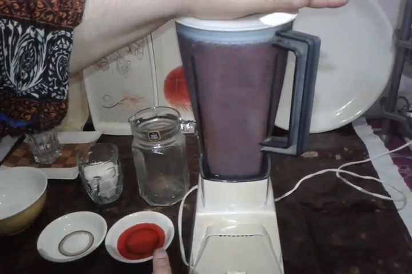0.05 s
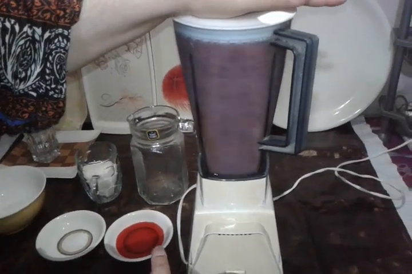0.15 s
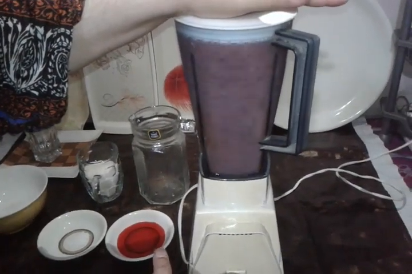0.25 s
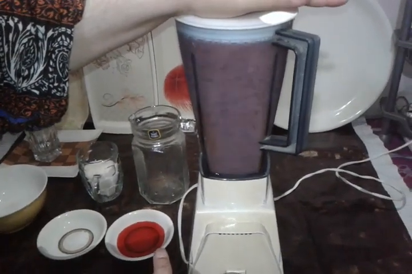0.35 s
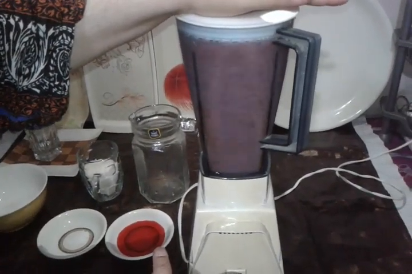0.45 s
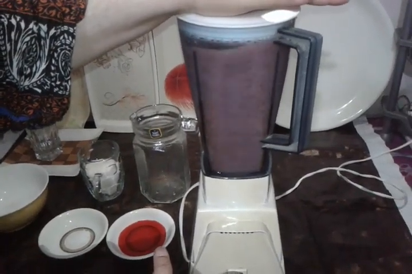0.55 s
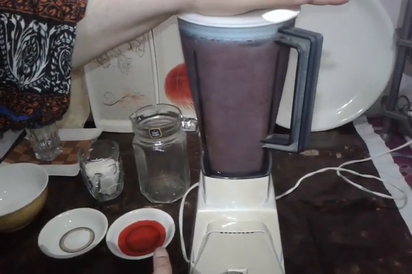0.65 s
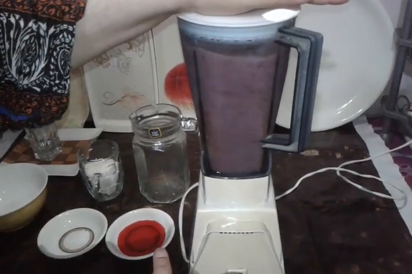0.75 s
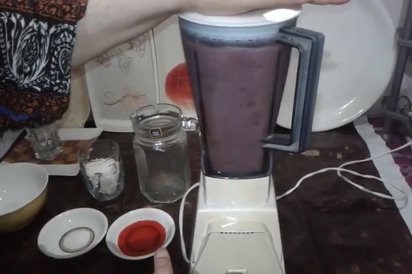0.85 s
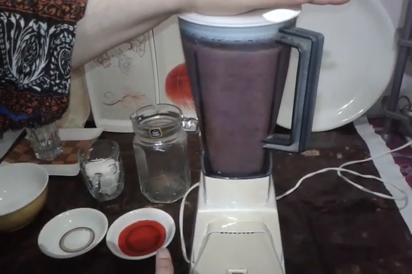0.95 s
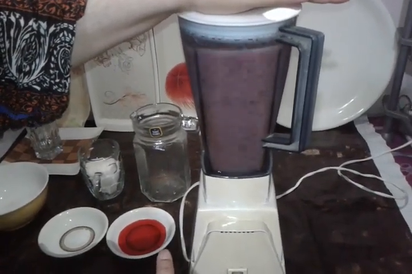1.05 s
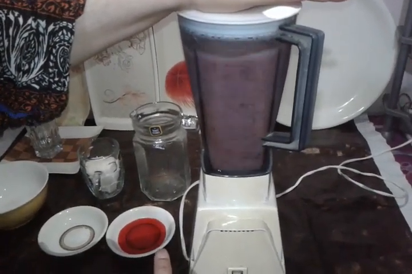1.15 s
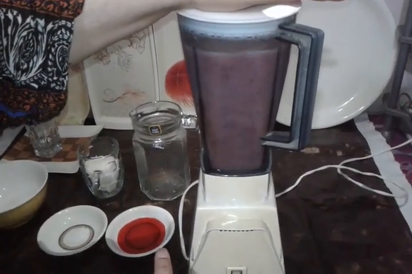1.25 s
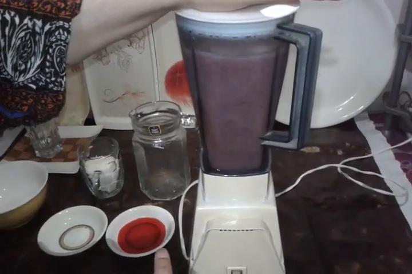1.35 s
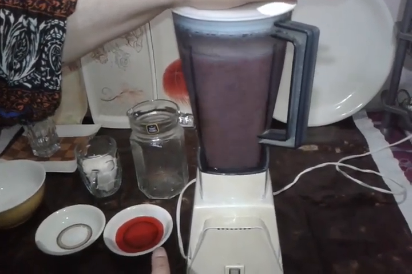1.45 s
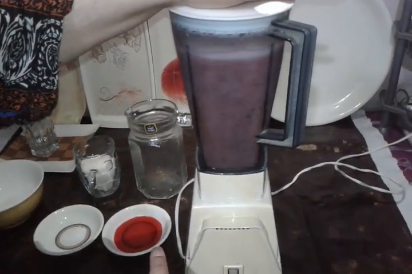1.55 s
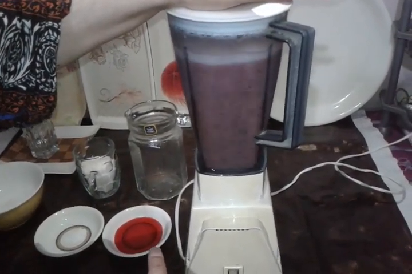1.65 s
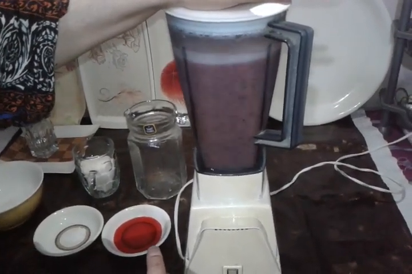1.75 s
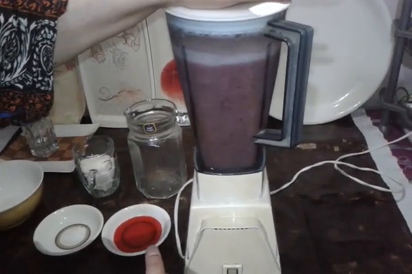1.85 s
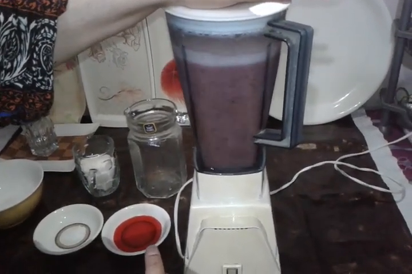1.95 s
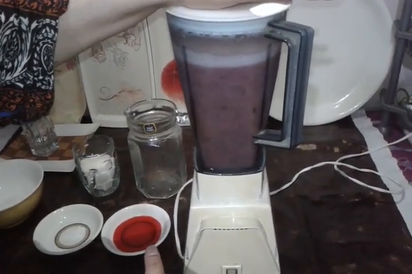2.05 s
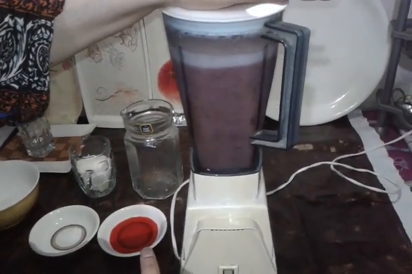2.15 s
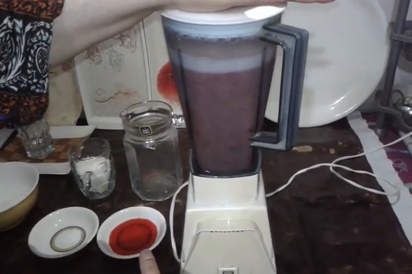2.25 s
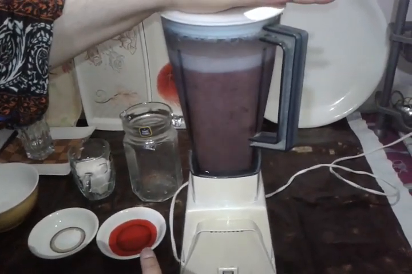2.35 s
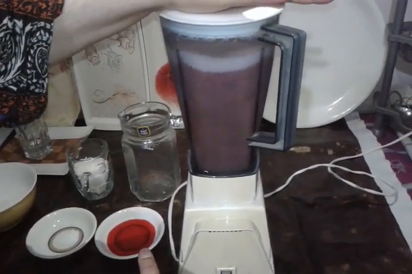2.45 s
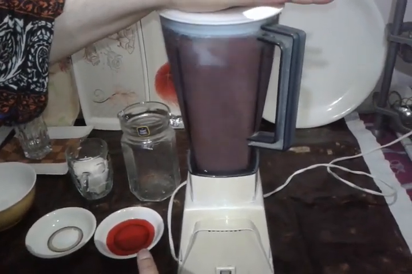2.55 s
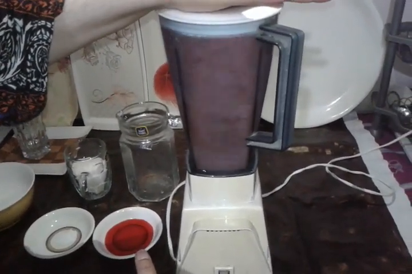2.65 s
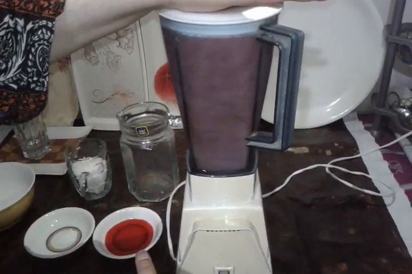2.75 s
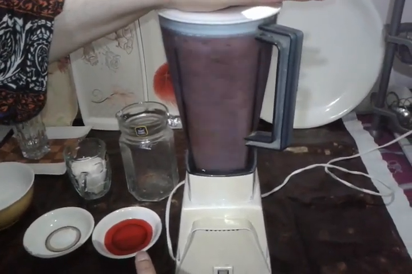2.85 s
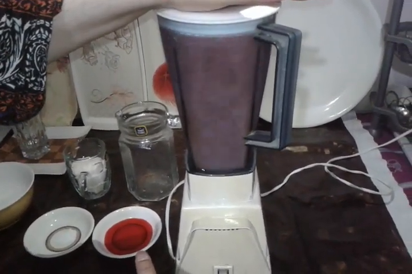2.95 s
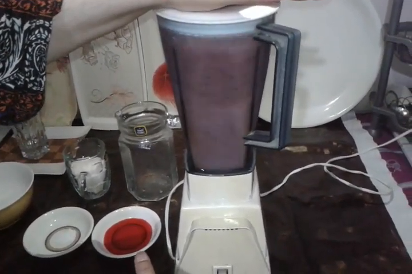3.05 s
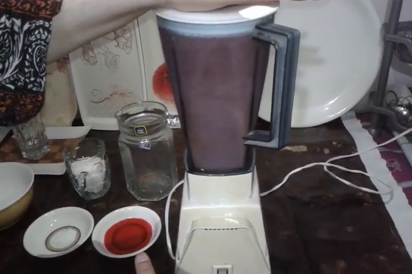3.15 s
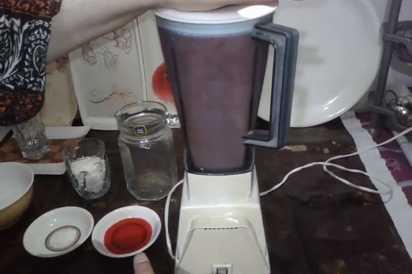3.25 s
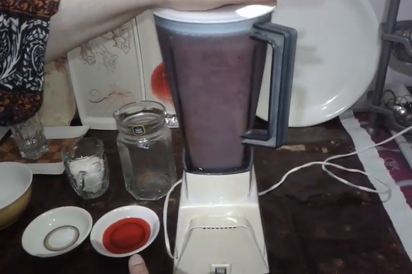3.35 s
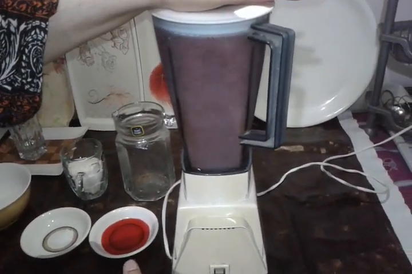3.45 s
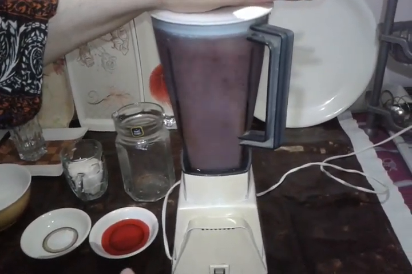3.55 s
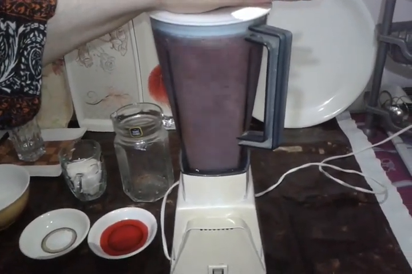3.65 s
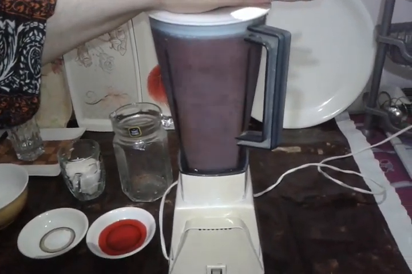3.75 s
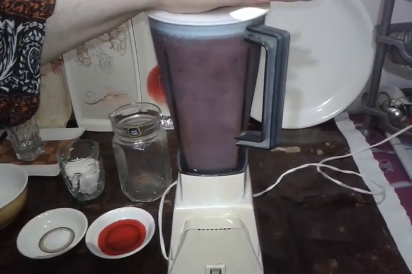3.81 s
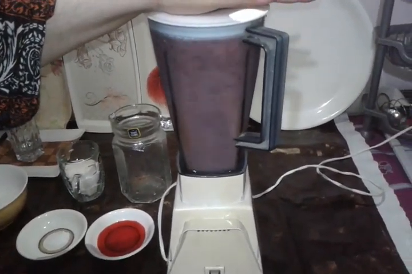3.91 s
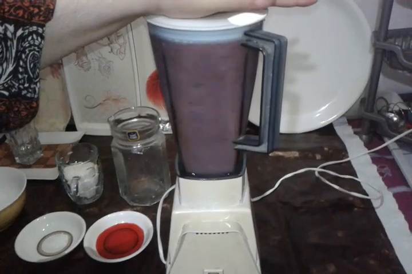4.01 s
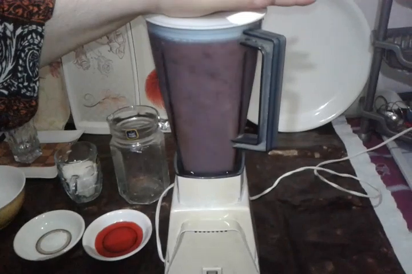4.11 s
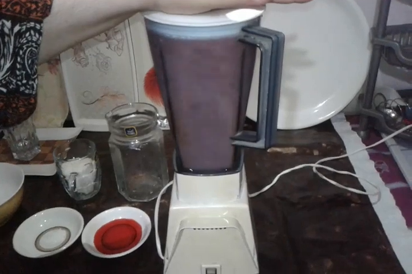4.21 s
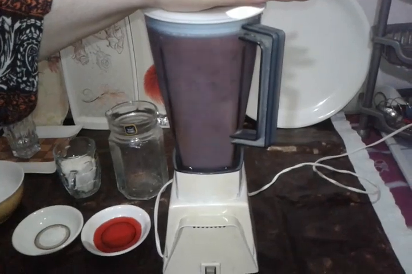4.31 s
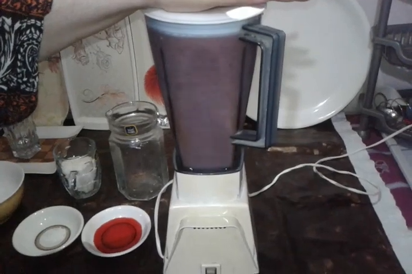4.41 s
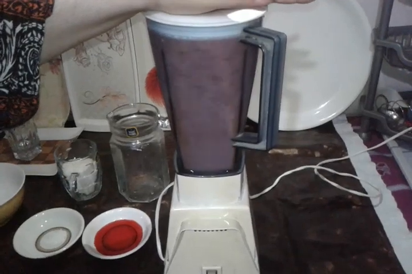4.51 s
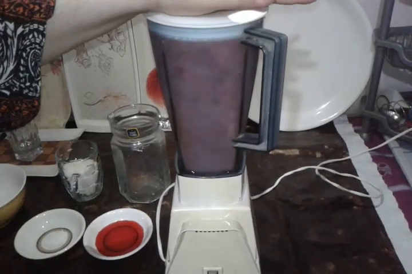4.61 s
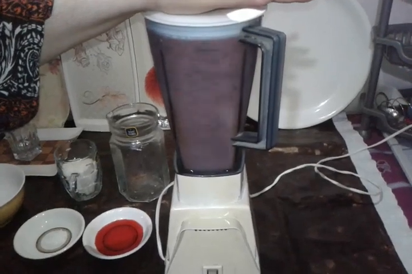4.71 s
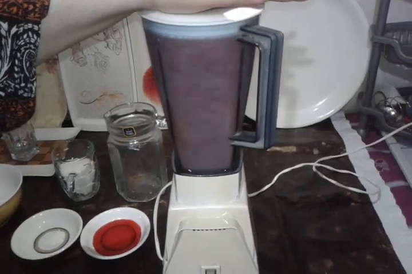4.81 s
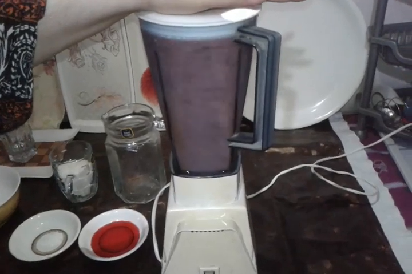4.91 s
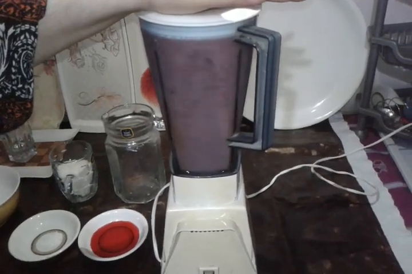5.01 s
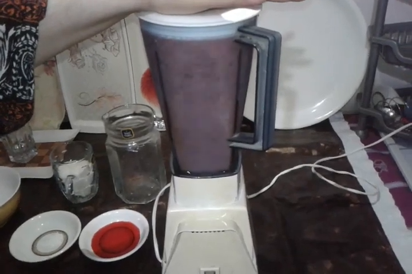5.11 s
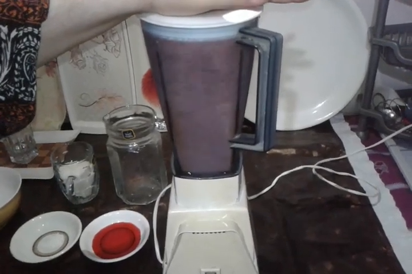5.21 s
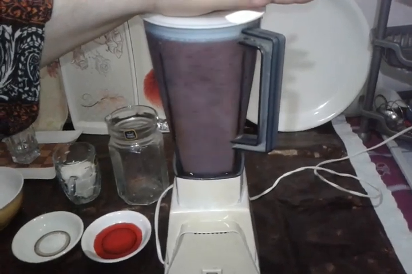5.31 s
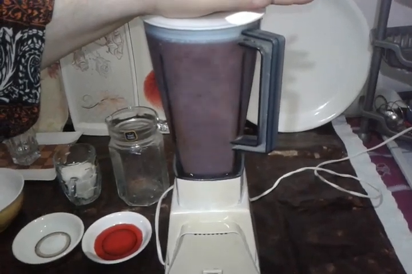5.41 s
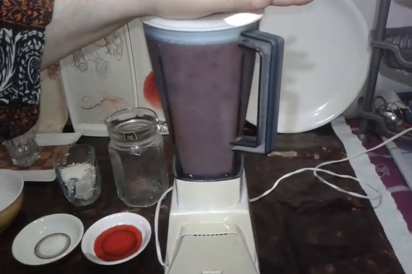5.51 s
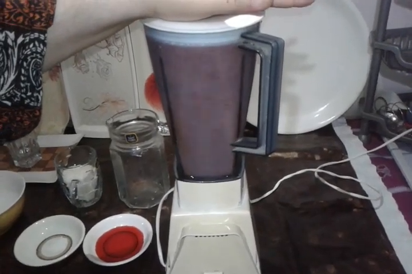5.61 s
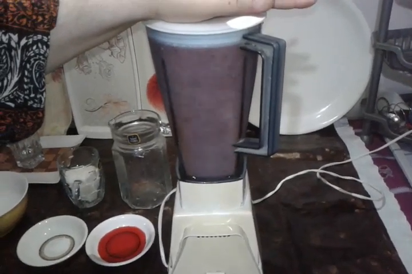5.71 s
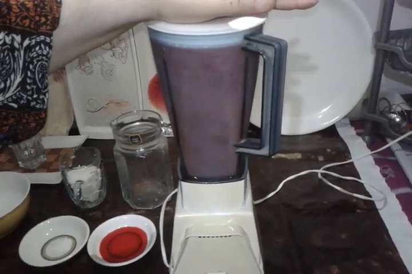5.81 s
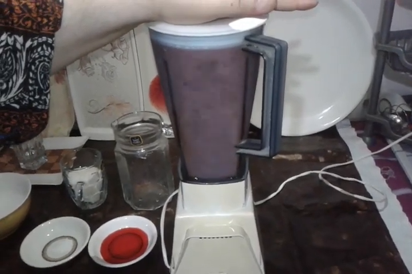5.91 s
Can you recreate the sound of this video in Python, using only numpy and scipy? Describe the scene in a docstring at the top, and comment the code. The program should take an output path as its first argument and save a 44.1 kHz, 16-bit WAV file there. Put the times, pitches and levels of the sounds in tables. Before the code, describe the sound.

A close mono pickup in a small, slightly reverberant kitchen. At 0 s a blender runs at full speed: motor hum around 236 Hz and its double, harsh rattle near 2 kHz, hissing bubbles around 5 kHz. Power is cut at about 0.13 s; the pitch glides down, the churning falls away abruptly around 0.5 s, and liquid sloshes to rest. From 0.55 to 2.3 s an insect gives rapid, even, raspy chirps near 6.8 kHz, about ten a second, growing slightly, over faint room hush; froth seethes softly around 1.2 s. A tiny knock comes at 1.8 s. At 2.36 s the switch snaps sharply; the blades labour in a low, loud growl with heavy liquid tumbling. At 2.66 s a gulp, then the motor races up within about 0.3 s, its pitch wavering briefly before steadying. Dense churning, a thin high whine and irregular bright seed ticks continue to the cut at 6 s.

```python
"""Blender, lull and restart

A countertop blender churns fruit and water in a small kitchen, is switched off and coasts to rest.
In the lull an insect chirps over the room's hush. The switch snaps, the blades labour in the settled
pulp, then draw a vortex and the motor races up to a whine, with seeds ticking on the jar.
The motor is sine tones locked to one shaft; churning, liquid, contacts and air are coloured noise."""
import sys
import numpy as np
from scipy import signal
from scipy.fft import rfft, irfft, next_fast_len
from scipy.io import wavfile
from scipy.ndimage import map_coordinates

SR = 44100
rng = np.random.default_rng(int(sys.argv[2]) if len(sys.argv) > 2 else 0)


def generate_wav(signal):
    """Clip the signal to [-1, 1] and save it as 16-bit WAV at the path in sys.argv[1]."""
    frames = np.transpose(np.atleast_2d(signal))
    scaled = np.clip(frames, -1, 1) * 32767
    pcm = np.round(scaled).astype(np.int16)
    wavfile.write(sys.argv[1], SR, pcm)


N = 263277

# In every colour table the level is relative: it sets the balance of the spectrum only.

# shaft speed with the vortex open, before hunting and waver: (time [s], speed [turns/s])
FREE_SPEED = [(0, 236), (3.1, 236.5), (3.65, 239.5), (4.3, 234.3), (4.6, 236), (5.05, 240.5), (5.35, 238),
              (5.97, 238.3)]
# unbalanced shaft and two-armed coupling at full speed: (time [s], once-a-turn [dB], twice-a-turn [dB])
SHAFT_HUM = [(0, -26.5, -22.5), (2.6, -26.5, -19), (2.74, -29, -25), (2.88, -25.5, -17), (3.0, -24, -28),
             (3.08, -28.5, -20.5), (3.3, -28, -22), (4.2, -28, -21.5), (4.35, -27.5, -27),
             (4.7, -28.5, -24.5), (5.97, -30, -25.5)]
# weaker shaft orders at full speed: (multiple of shaft speed, level [dB])
SHAFT_ORDERS = [(3, -39.5), (4, -43.5), (5, -42.5), (6, -38), (7, -38.5), (8, -45.5), (9, -39), (10, -48)]
# filled-jar resonances that the blade beat sweeps through: (frequency [Hz], width [Hz], gain [dB])
JAR_RESONANCES = [(437, 35, -4.5), (569, 79, -0.5)]
# colour of pulp rattling the jar: (frequency [Hz], level [dB])
RATTLE_COLOUR = [(400, -45.5), (650, -3.5), (820, -13), (1000, -6.5), (1200, -4.5), (1550, -4),
                 (1750, -3.5), (1930, 4), (2130, -0.5), (2300, -7), (2700, -11.5), (3300, -14.5),
                 (4200, -17.5), (6000, -73)]
# colour of collapsing bubbles: (frequency [Hz], level [dB])
CAVITATION_COLOUR = [(2400, -49.5), (3200, -20.5), (3650, -15.5), (4200, -7), (4700, 0), (5100, -3.5),
                     (5500, -8), (5800, -8.5), (6300, -16.5), (6900, -22.5), (7600, -35), (9500, -52)]
# colour of the fine hiss above them: (frequency [Hz], level [dB])
SPRAY_COLOUR = [(4120, -48), (7000, 0), (8560, 3.5), (9300, -4.5), (9720, -5.5), (10700, 1.5), (11800, -5),
                (13200, -2), (13700, -9), (14200, -11)]
# bubble clouds collapse as the load shifts: (time [s], extra cavitation and spray [dB], half length [s])
SURGES = [(.135, 3, 0.012), (0.47, 3.5, 0.017), (2.45, 4, 0.057)]
# colour of tumbling liquid: (frequency [Hz], level [dB])
LIQUID_COLOUR = [(25, -35), (60, -21), (100, -22.5), (135, -5.5), (170, -11), (228, 3), (290, -6.5),
                 (420, 3.5), (560, 5.5), (690, -10.5), (800, -10), (1200, -34)]
# the opening vortex swallows air: (time [s], strength [dB])
GULP = [(2.659, -10.5), (2.666, -29)]
# colour of the gulp: (frequency [Hz], level [dB])
GULP_COLOUR = [(50, -43), (120, -21), (220, -4.5), (300, 0), (420, -4), (600, -22), (1000, -40)]
# colour of trapped air surfacing: (frequency [Hz], level [dB])
SEETHE_COLOUR = [(3800, -45), (4500, -12), (4740, 0), (4950, -6), (5300, -13), (6000, -44)]
# seeds flung at the jar: (time [s], strength [dB])
SEEDS = [(.1196, -16), (.3072, -19), (.5043, -16.5), (.862, -31), (1.185, -45), (2.3955, -16.5),
         (2.6693, -18), (2.7352, -15), (2.9567, -14), (3.1248, -16.5), (3.2061, -16.5), (3.46, -12),
         (3.9175, -16), (3.9774, -15.5), (4.1515, -12.5), (4.3001, -12.5), (4.4583, -13), (4.5311, -17),
         (4.7356, -14.5), (4.8863, -16)]
# colour of a seed tick: (frequency [Hz], level [dB])
SEED_COLOUR = [(1500, -22), (3500, -8), (5500, 13.5), (7000, -4), (8400, 0), (9600, -6), (11000, -4),
               (14000, -5)]
# nudges of the housing: (time [s], strength [dB])
KNOCKS = [(1.79, -35.5), (2.3415, -27)]
# colour of a nudge: (frequency [Hz], level [dB])
KNOCK_COLOUR = [(60, -35), (150, -18), (300, -12), (430, 6), (750, -20), (2000, -4), (3000, -29),
                (9000, -52)]
# the switch snaps on: (time [s], strength [dB])
SWITCH = [(2.3562, -5.5)]
# colour of the snap: (frequency [Hz], level [dB])
SWITCH_COLOUR = [(100, -47), (300, -22), (1200, -14), (1650, -3), (1970, 7), (2300, -4), (2800, -17),
                 (4700, 1), (6000, -4), (8000, -18), (14000, -19)]
# loudness curve of the insect: (time [s], gain [dB])
CHIRP_LEVEL = [(.55, -42.5), (1.2, -40.5), (1.6, -37.5), (2.3, -36)]
# sharp resonance of the insect: (frequency [Hz], level [dB])
INSECT_COLOUR = [(4500, -27), (5700, -24), (6100, -3), (6450, 0), (6700, 8), (6900, 8.5), (7050, 6.5),
                 (7200, -17), (7450, -22), (8500, -55), (13000, -28), (15000, -40)]
# loudness curve of the room's air: (time [s], gain [dB])
HUSH_LEVEL = [(0, -39), (1.2, -54), (1.6, -50), (2.35, -49), (5.97, -41)]
# colour of the room's air: (frequency [Hz], level [dB])
HUSH_COLOUR = [(35, -63), (60, -14), (178, -12), (233, 0), (299, -12.5), (384, -8), (552, -15), (619, -2),
               (655, -15), (840, -9), (1230, -12), (1990, 0.5), (2700, -17), (5070, -11), (5800, -12),
               (7540, -41), (12800, -120)]
# faint hum of the room: (frequency [Hz], level [dB])
ROOM_HUM = [(102.3, -73.5), (236.9, -75), (382.2, -67)]

# power cut, vortex falls in, power back, vortex opens
OFF_S, COLLAPSE_S, ON_S, VORTEX_S = 0.13, 0.5, 2.356, 2.692
# time constants of coasting, starting in pulp and racing up
COAST_S, START_S, RACE_S = 0.475, 0.047, 0.095
LABOUR_HZ = 136.56  # mean shaft speed with the blades buried in pulp
STIR_S = 0.033  # the settled pulp takes this long to start moving
# the speed swings while the new vortex steadies
HUNT_HZ, HUNT_PERIOD_S, HUNT_CREST_S, HUNT_LIFE_S = 3.87, 0.26, 3.37, 0.51
COAST_SHAKE = 0.54  # phase flutter of the unpowered shaft [radians], growing as it slows
HUM_FADE_S, HUM_FADE_DB_PER_S = 0.33, 110  # the coasting shaft stops shaking the housing
ONCE_POWER, TWICE_POWER, CHURN_POWER = 1.8, 4.3, 0.56  # amplitude grows as this power of the speed
# blade beat ahead of the jar's resonances: driven through pulp, coasting, in the vortex
BLADE_DB, BLADE_COAST_DB, BLADE_FREE_DB = -18.5, -30, -35
WALL_HZ, WALL_WIDTH_HZ, WALL_LIFT_DB = 1914, 135, 9.5  # the jar wall lifts any shaft order passing here
WHINE_DB, WHINE_SWELL_S = -33, 0.65  # the commutator stands out once the vortex opens
RATTLE_DB, CAVITATION_DB, SPRAY_DB = -22, -20.5, -35  # churning at full speed
LOAD_DB = 2.5  # extra churning with the blades buried
# motor and churning drop as the vortex falls in, then die away
COLLAPSE_DB, COLLAPSE_FALL_S, SETTLE_DB_PER_S = 5.5, 0.051, 28.5
SLOSH_DB, SLOSH_LOAD_DB, SLOSH_COAST_DB = -33.5, 10.5, 0.5  # base, rise when labouring, rise when coasting
SLOSH_REST_S, SLOSH_DB_PER_S = 0.74, 62  # the liquid comes to rest from here on
# trapped air surfaces: crest time and level, slopes on either side
SEETHE_S, SEETHE_DB, SEETHE_RISE_DB_PER_S, SEETHE_FALL_DB_PER_S = 1.23, -47.5, 28, 48
CHIRP_FIRST_S, CHIRP_PERIOD_S = 0.552, 0.0969
TOP_HZ = 14050  # band limit of the recorder


def shaft():
    """Turns per second: drag slows the shaft, pulp holds it back, the vortex sets it free."""
    t = clock()
    free, = curves(FREE_SPEED)
    swing = t - HUNT_CREST_S
    hunt_life = np.exp(-0.5 * (swing / HUNT_LIFE_S) ** 2)
    free = free + HUNT_HZ * np.cos(2 * np.pi * swing / HUNT_PERIOD_S) * hunt_life
    coasting = free * np.exp(-since(OFF_S) / COAST_S)
    starting = LABOUR_HZ * (1 - np.exp(-since(ON_S) / START_S))
    racing = (free - LABOUR_HZ) * (1 - np.exp(-since(VORTEX_S) / RACE_S))
    return np.where(t < ON_S, coasting, starting + racing)


def motor(speed, angle, load, coasting, settle_db):
    """Shaft orders with mains ripple, the blade beat through the jar, and the commutator's whine."""
    once_db, twice_db = curves(SHAFT_HUM)
    pace = speed / speed.max()
    angle = angle + coasting * COAST_SHAKE * wobble(44.8) * (1 - pace)

    once = amp(once_db + 1.33 * wobble(14) + 4.3 * coasting * wobble(28.8)) * pace ** ONCE_POWER
    twice = amp(twice_db + 1.2 * wobble(13) + 4.3 * coasting * wobble(31)) * pace ** TWICE_POWER
    hum = once * tone(angle) + twice * tone(2 * angle)
    hum *= amp(-HUM_FADE_DB_PER_S * coasting * since(HUM_FADE_S))

    # mains torque ripple: tones 100 and 200 Hz above the shaft orders, as strong as the shaft's level sets
    mains = 2 * np.pi * 100 * clock()
    ripple = once * (amp(-17.5) * tone(angle + mains) + amp(-14) * tone(angle + 2 * mains))
    ripple += twice * amp(-16) * tone(2 * angle + mains)

    # four beats a turn, loudest where they cross a resonance of the jar
    beat = load * amp(BLADE_DB) + coasting * amp(BLADE_COAST_DB)
    beat += (1 - load - coasting) * amp(BLADE_FREE_DB)
    jar = sum(amp(db) * resonance(4 * speed, hz, width) ** 2 for hz, width, db in JAR_RESONANCES)
    blades = beat * jar * amp(3.5 * wobble(70)) * tone(4 * angle + 0.5 * wobble(61))

    # play in the coupling makes the higher orders flutter
    buzz = np.zeros(N)
    for order, db in SHAFT_ORDERS:
        lift_db = WALL_LIFT_DB * resonance(order * speed, WALL_HZ, WALL_WIDTH_HZ)
        buzz += amp(db + lift_db + 2.96 * wobble(12)) * tone(order * angle + 0.55 * wobble(30))
    buzz *= pace ** 1.4

    # 24 commutator cycles a turn
    whine = amp(WHINE_DB + 2.5 * wobble(9)) * tone(24 * angle + 0.25 * wobble(70))
    whine *= ramp(VORTEX_S, WHINE_SWELL_S)

    # the small housing radiates little bass
    housing = signal.butter(9, 133, "highpass", fs=SR, output="sos")
    return signal.sosfilt(housing, amp(settle_db) * (hum + ripple + blades + buzz + whine))


def churn(angle, effort_db):
    """Pulp and collapsing bubbles hammer the jar; the rattle pulses with the shaft's turns."""
    surge_db = sum(db * np.exp(-0.5 * ((clock() - s) / length) ** 2) for s, db, length in SURGES)
    sweep = 1 + 0.06 * np.sin(angle) + 0.15 * np.sin(2 * angle)
    rattle = unit(coloured(crackle(rate=4500, spread_db=0) * sweep, RATTLE_COLOUR))
    rattle *= amp(RATTLE_DB + effort_db + 0.52 * wobble(45))

    bursts = crackle(rate=8000, spread_db=0) * amp(0.28 * wobble(140))
    cavitation = unit(coloured(bursts, CAVITATION_COLOUR))
    cavitation *= amp(CAVITATION_DB + effort_db + surge_db + 0.6 * wobble(25))

    droplets = bursts + 1.7 * crackle(rate=11000, spread_db=-2)
    spray = unit(coloured(droplets, SPRAY_COLOUR))
    spray *= amp(SPRAY_DB + effort_db + surge_db + 0.88 * wobble(33))
    return kitchen(rattle + cavitation + spray, wet_db=-5, t60=0.46)


def slosh(load, coasting):
    """Liquid tumbles in the jar, gulps as the vortex opens, and seethes when left to settle."""
    coast_db = SLOSH_COAST_DB - SLOSH_DB_PER_S * since(SLOSH_REST_S)
    level_db = SLOSH_DB + SLOSH_LOAD_DB * load + coasting * coast_db
    moving = np.where(clock() < ON_S, 1, ramp(ON_S, STIR_S))
    tumble = unit(coloured(crackle(rate=1100, spread_db=1.5), LIQUID_COLOUR)) * amp(level_db) * moving

    late = clock() - SEETHE_S
    seethe_db = SEETHE_DB - np.maximum(-SEETHE_RISE_DB_PER_S * late, SEETHE_FALL_DB_PER_S * late)
    froth = unit(coloured(crackle(rate=3500, spread_db=5), SEETHE_COLOUR)) * amp(seethe_db)

    gulp = hits(GULP, GULP_COLOUR, t60=0.041)
    return kitchen(tumble + froth + gulp, wet_db=2, t60=0.17)


def contacts():
    """Seeds tick on the jar, the housing is nudged and the switch snaps."""
    seeds = kitchen(hits(SEEDS, SEED_COLOUR, t60=0.048), wet_db=1, t60=0.2)
    knocks = kitchen(hits(KNOCKS, KNOCK_COLOUR, t60=0.03), wet_db=-4, t60=0.2)
    switch = kitchen(hits(SWITCH, SWITCH_COLOUR, t60=0.02), wet_db=-7, t60=0.2)
    return seeds + knocks + switch


def insect(click_hz=175, chirp_s=0.024, between_db=-17, count=19):
    """Even chirps, each a swelling rasp on a sharp resonance with two hard clicks; a faint rasp runs on."""
    t = clock()
    crests = CHIRP_FIRST_S + CHIRP_PERIOD_S * np.arange(count)
    swell = sum(np.exp(-0.5 * ((t - s) / chirp_s) ** 2) for s in crests)
    level_db, = curves(CHIRP_LEVEL)

    # a click at each whole cycle of an uneven clock
    turns = np.floor(np.cumsum(click_hz * (1 + 0.2 * wobble(150))) / SR)
    clicks = unit(np.diff(turns, prepend=0) * amp(2 * rng.standard_normal(N)))
    rasp = amp(-2) * unit(clicks + rng.standard_normal(N)) * (swell + amp(between_db))

    for offset_s in (-0.008, 0.009):  # one hard click on either side of the crest
        places = np.round((crests + offset_s) * SR).astype(int)
        rasp[places] += amp(22.5 + rng.standard_normal(count))
    return kitchen(coloured(rasp * amp(level_db), INSECT_COLOUR), wet_db=-8, t60=0.2)


def hush():
    """The room's air as coloured noise with a little white noise, and a faint wavering hum."""
    level_db, = curves(HUSH_LEVEL)
    air = unit(coloured(rng.standard_normal(N), HUSH_COLOUR)) + amp(-16) * rng.standard_normal(N)
    hum = np.zeros(N)
    for hz, db in ROOM_HUM:
        phase = 2 * np.pi * hz * clock() + 0.29 * wobble(6.9)
        hum += amp(db + 4.4 * wobble(5.5)) * np.sqrt(2) * np.sin(phase)
    return amp(level_db) * air + hum


def kitchen(x, wet_db, t60):
    """Add the short answer of the table and the walls; its fine detail is redrawn eight times a second."""
    t, hop = np.arange(SR // 4) / SR, SR // 8
    echo = np.zeros(N + SR)
    padded = np.pad(x, (hop, 2 * hop))
    fade = np.sin(np.pi * np.arange(2 * hop) / (2 * hop))
    for start in range(0, N, hop):  # overlapping pieces, each with a fresh noise tail
        tail = rng.standard_normal(len(t)) * amp(-60 * t / t60) * (t > 0.002)
        piece = signal.fftconvolve(padded[start:start + 2 * hop] * fade, tail / np.linalg.norm(tail))
        echo[start:start + len(piece)] += piece
    return (x + amp(wet_db) * echo[hop:hop + N]) / np.hypot(1, amp(wet_db))


def hits(table, colour, t60):
    """Each contact is a fast-dying burst in the colour of the thing struck."""
    out, t = np.zeros(N + SR), np.arange(SR // 8) / SR
    for s, db in table:
        out[round(s * SR):][:len(t)] += amp(db - 60 * t / t60) * rng.standard_normal(len(t))
    return coloured(out[:N], colour)


def crackle(rate, spread_db):
    """Random tiny impacts of unequal size, rate a second on average, rms 1."""
    struck = rng.random(N) < rate / SR
    size_db = spread_db * np.clip(rng.standard_normal(N), -2, 2)
    return unit(struck * rng.standard_normal(N) * amp(size_db))


def coloured(x, points, size=8192):
    """x through a causal filter of energy 1 shaped like the (frequency [Hz], level [dB]) points."""
    hz, db = np.transpose(points)
    gain = amp(np.interp(np.log(np.fft.rfftfreq(size, 1 / SR) + 1), np.log(hz), db))
    # folding the cepstrum forward in time gives minimum phase
    cepstrum = irfft(np.log(gain))
    cepstrum[1:size // 2] *= 2
    cepstrum[size // 2 + 1:] = 0
    response = irfft(np.exp(rfft(cepstrum)))
    return signal.fftconvolve(x, response / np.linalg.norm(response))[:N]


def resonance(hz, centre_hz, width_hz):
    """Gain of a resonance for a tone at hz, 1 at its centre."""
    return 1 / np.hypot(1, 2 * (hz - centre_hz) / width_hz)


def tone(phase):
    """A sine of rms 1 along a phase curve, from a random starting phase."""
    return np.sqrt(2) * np.sin(phase + rng.uniform(0, 2 * np.pi))


def wobble(rate, step=32):
    """A smooth random curve, rate knots a second."""
    t = clock()
    knots = rng.standard_normal(int(N * rate / SR) + 4)
    return np.interp(t, t[::step], map_coordinates(knots, [t[::step] * rate]))


def amp(db):
    """Decibels to gain."""
    return 10 ** (np.asarray(db) / 20)


def unit(x):
    """Scale to rms 1."""
    return x / np.sqrt(np.mean(x ** 2) + 1e-20)


def clock():
    """The time of every sample in seconds."""
    return np.arange(N) / SR


def since(s):
    """Seconds gone by since a moment, zero before it."""
    return np.maximum(clock() - s, 0)


def ramp(s, length):
    """Rises from 0 to 1 over a length of time that begins at s."""
    return np.minimum(since(s) / length, 1)


def curves(table):
    """One value per sample for each column after the time."""
    s, *columns = np.transpose(table)
    return [np.interp(clock(), s, column) for column in columns]


def scene():
    """One shaft drives the hum and the churning; lumps in the pulp make its speed waver."""
    speed = shaft()
    angle = 2 * np.pi * np.cumsum(speed * (1 + 0.001 * wobble(20))) / SR
    off = clock() < ON_S
    coasting = off * ramp(OFF_S, length=0.11)
    load = ramp(ON_S, STIR_S) * (1 - ramp(VORTEX_S - 0.01, length=0.028))
    settle_db = -COLLAPSE_DB * ramp(COLLAPSE_S, COLLAPSE_FALL_S) - SETTLE_DB_PER_S * since(COLLAPSE_S)
    settle_db = off * settle_db
    effort_db = CHURN_POWER * 20 * np.log10((speed + 1) / speed.max())
    effort_db = effort_db + LOAD_DB * load + settle_db + 0.26 * wobble(14)
    blender = motor(speed, angle, load, coasting, settle_db) + churn(angle, effort_db)
    blender = blender + slosh(load, coasting) + contacts()
    return (blender + insect() + hush())[None]


def record(dry):
    """The recorder keeps nothing above its band limit."""
    size = next_fast_len(N + SR // 2)
    kept = np.fft.rfftfreq(size, 1 / SR) < TOP_HZ
    return irfft(rfft(dry, size) * kept, size)[:, :N]


dry = scene()
out = record(dry)
generate_wav(out)
```